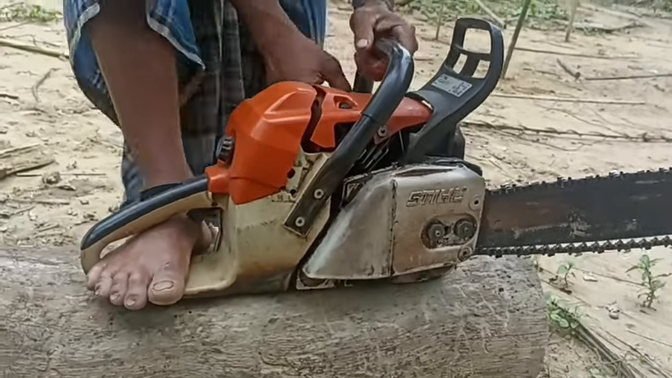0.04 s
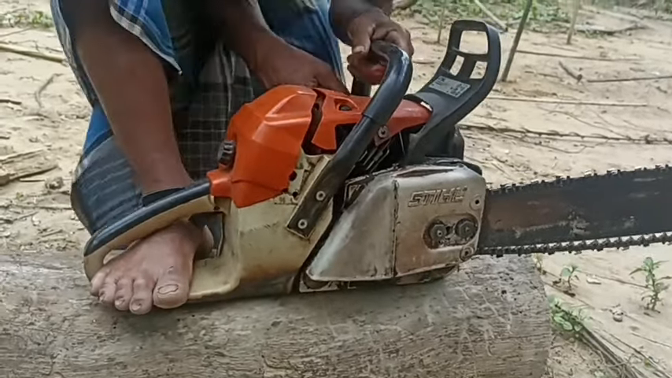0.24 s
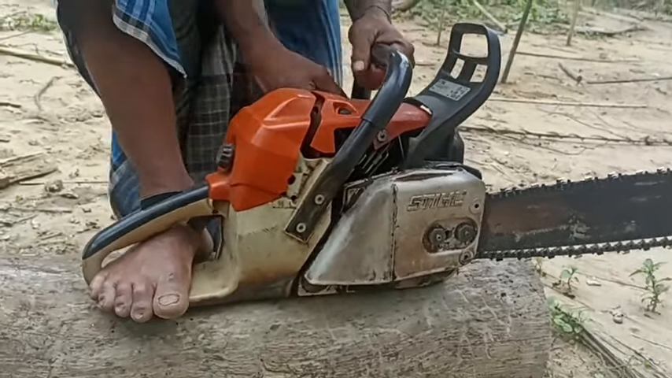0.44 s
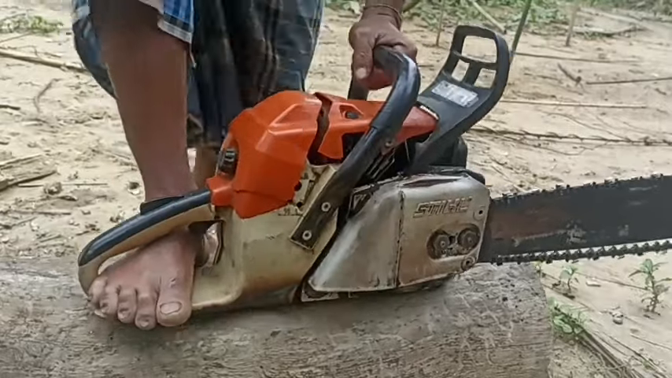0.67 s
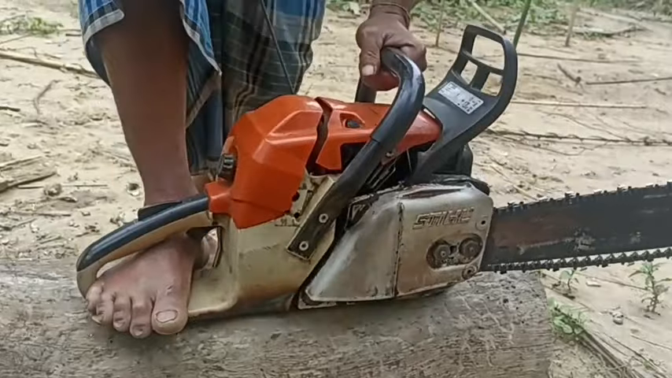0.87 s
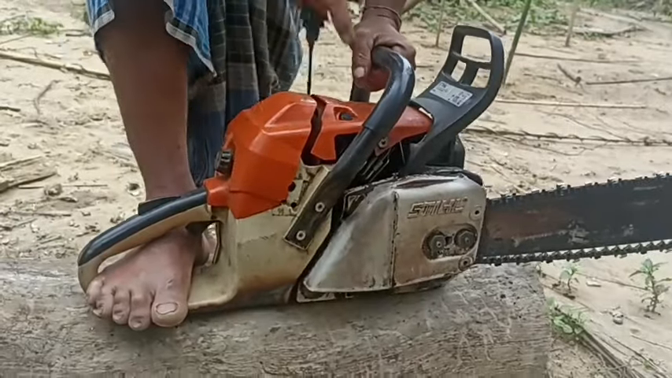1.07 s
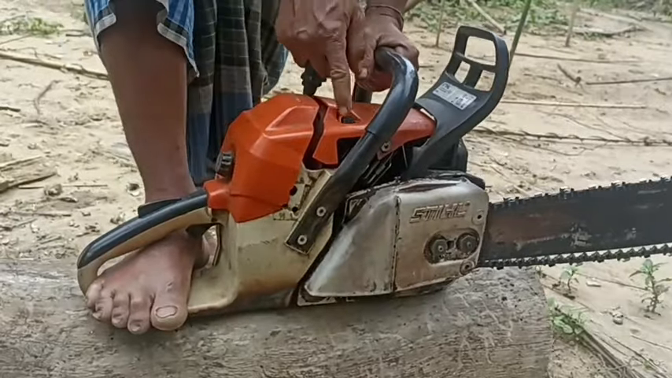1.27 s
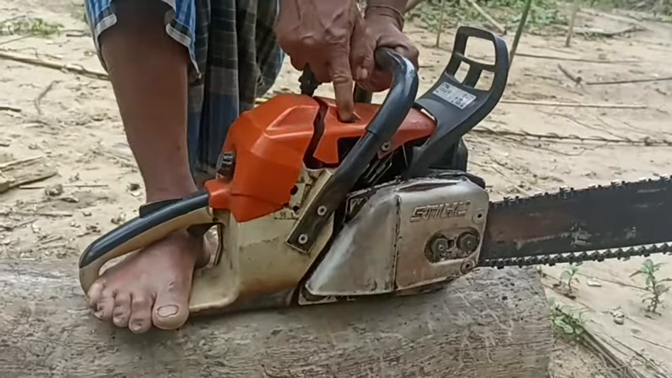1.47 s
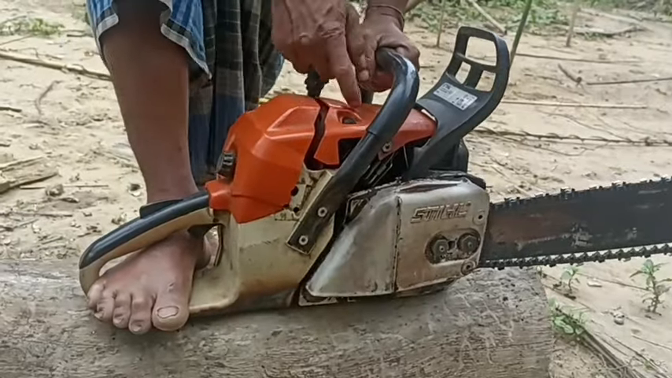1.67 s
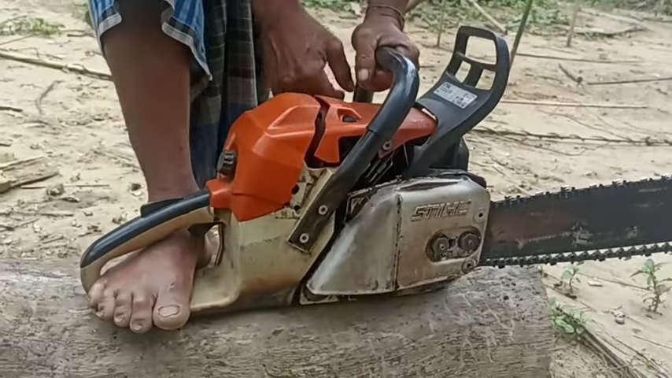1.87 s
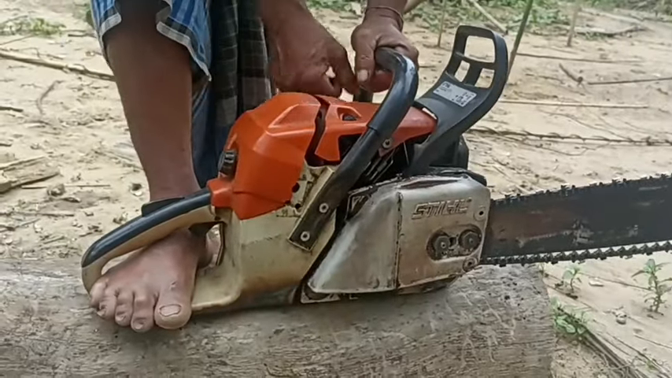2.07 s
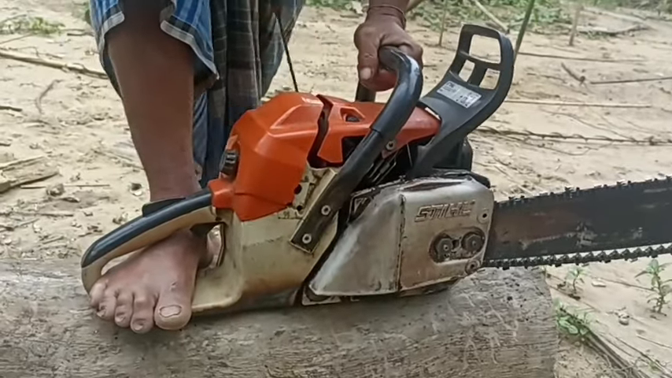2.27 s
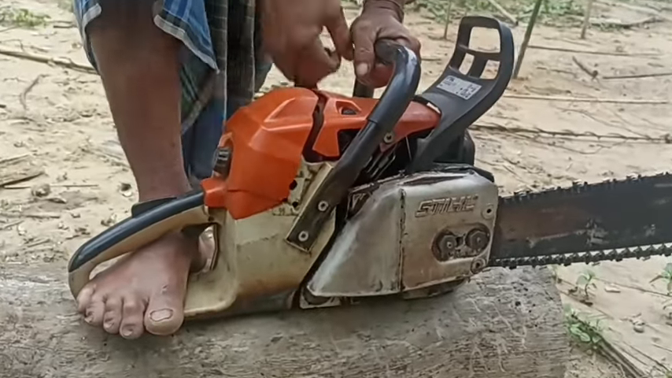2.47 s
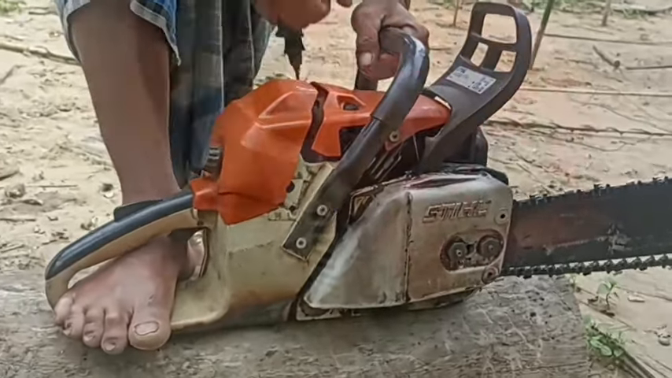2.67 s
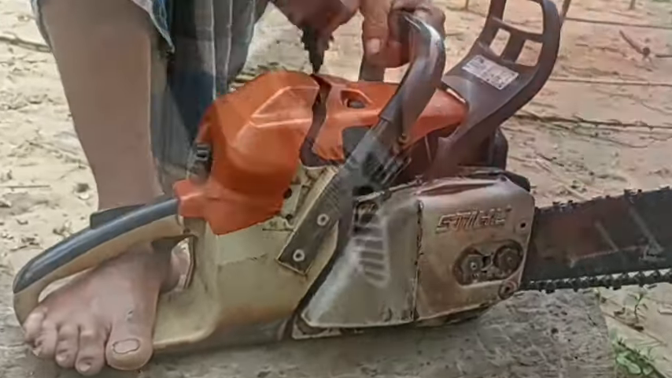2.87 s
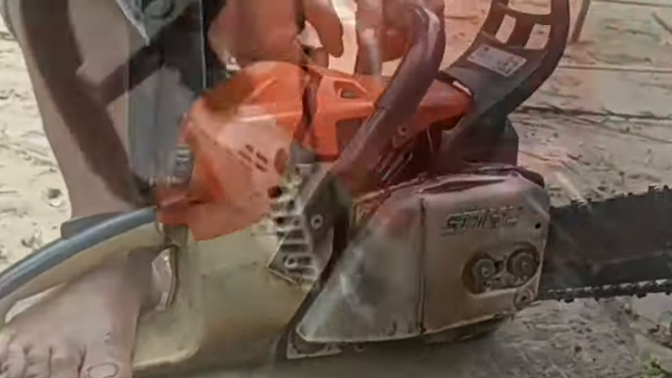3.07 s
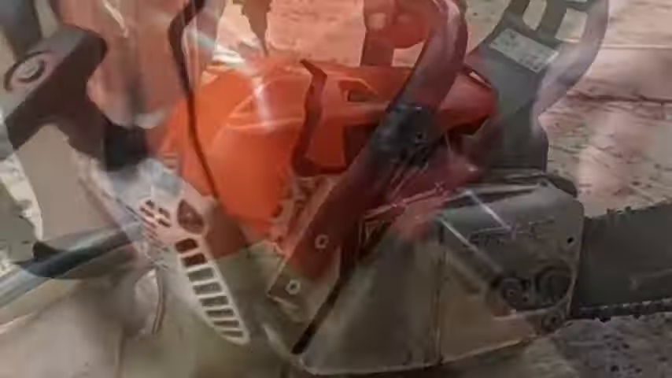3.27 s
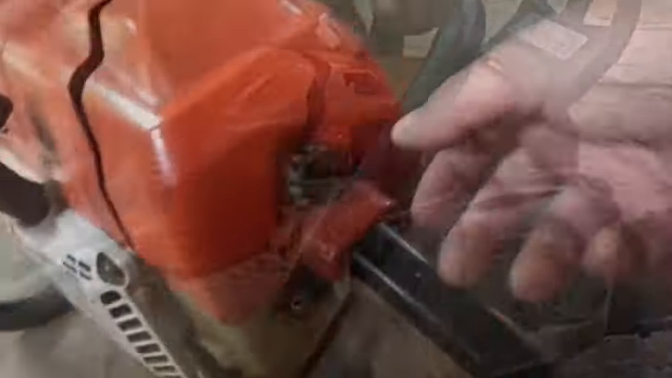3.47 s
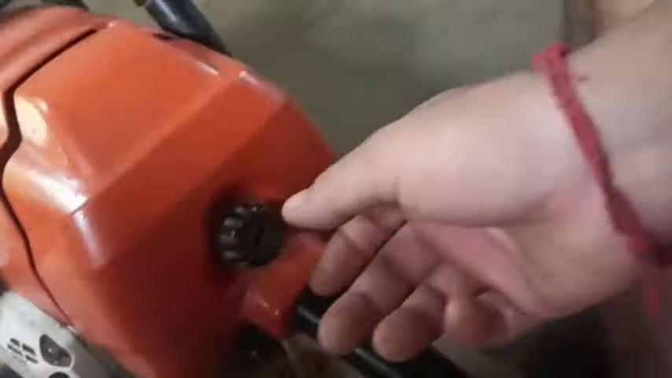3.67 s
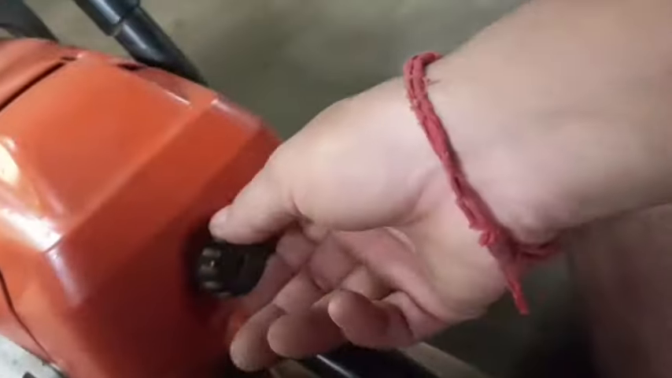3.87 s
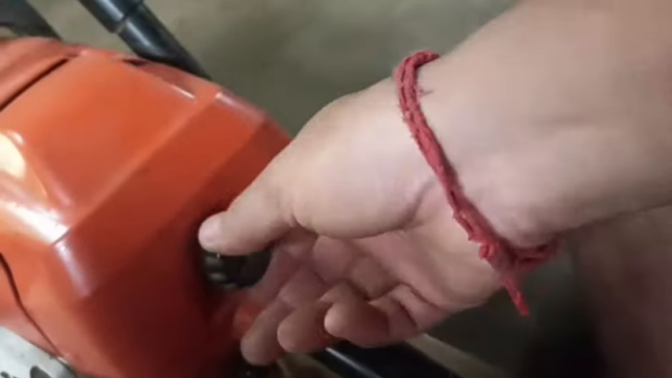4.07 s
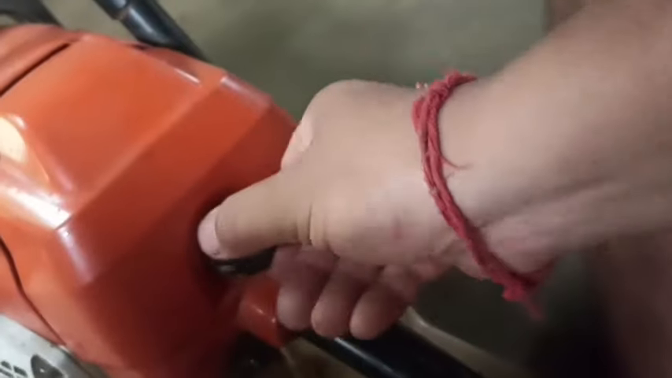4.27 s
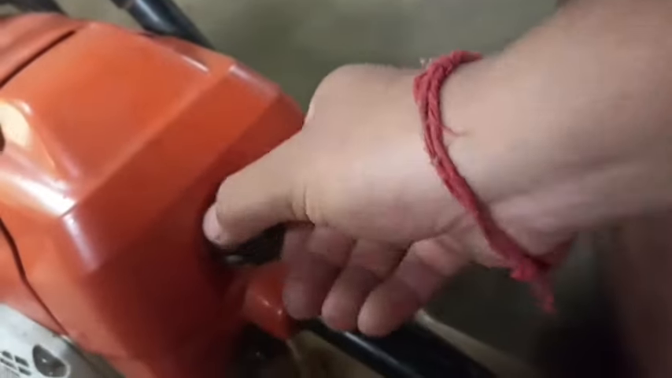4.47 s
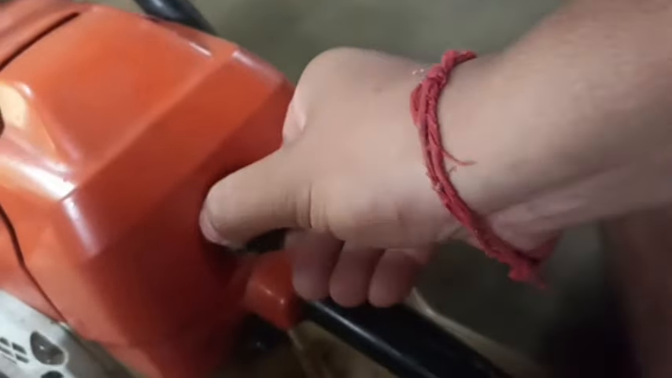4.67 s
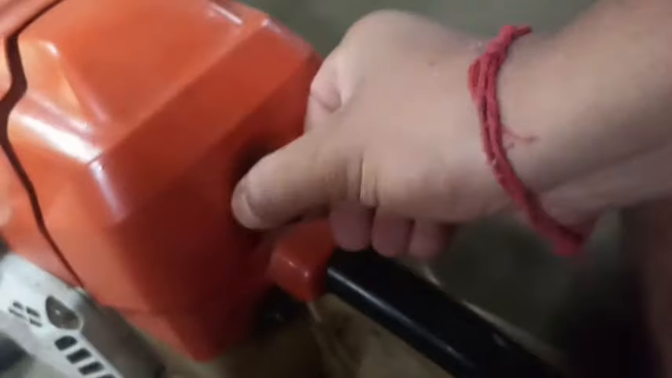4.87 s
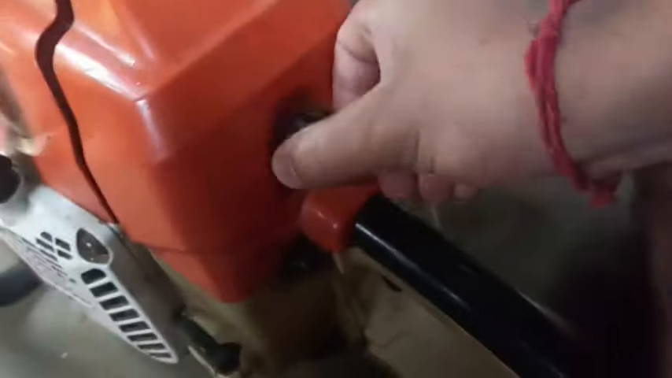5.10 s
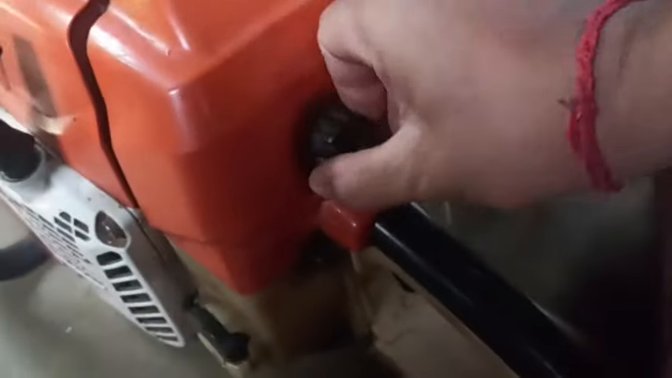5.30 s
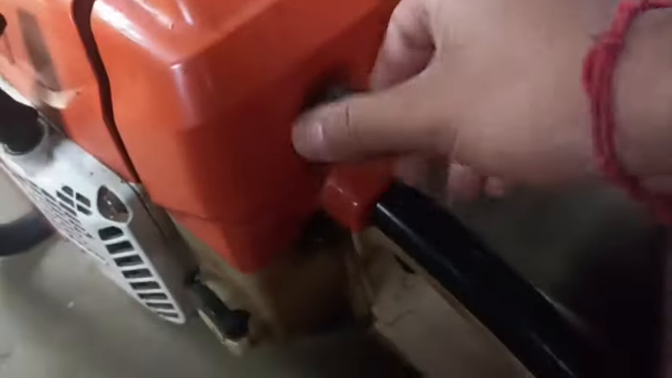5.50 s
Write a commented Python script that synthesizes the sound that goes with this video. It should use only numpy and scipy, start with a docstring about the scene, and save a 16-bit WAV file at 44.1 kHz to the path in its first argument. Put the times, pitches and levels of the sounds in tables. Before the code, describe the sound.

Close by, outdoors, a small two-stroke chainsaw gets one hard pull on its starter rope. It turns over with rapid low puffs and clatter, slowing to a stop without firing. A switch snaps sharply. The rope is drawn slowly, with rubbing, knocks on the casing and soft gliding low tones. The faint outdoor air then fades into a quieter place, where fingers lightly tap and slide on a plastic knob.

```python
"""A small two-stroke saw is pull-started on a log outdoors: the crank spins ten turns without firing, puffs through
the muffler and stops; the rope handle and starter pawls knock on the casing,
a switch snaps, and soft low tones glide up and down as the rope is drawn slowly. The scene then fades to a quieter
place, where fingers work the plastic knob of the cover."""
import sys
import numpy as np
from scipy.fft import rfft, irfft, next_fast_len
from scipy.io import wavfile
from scipy.ndimage import uniform_filter1d, map_coordinates

SR = 44100
rng = np.random.default_rng(int(sys.argv[2]) if len(sys.argv) > 2 else 0)


def int16_out(signal):
    """Quantize to a 16-bit WAV file."""
    q = np.round(np.clip(np.atleast_2d(signal).T, -1, 1) * 32767)
    wavfile.write(sys.argv[1], SR, q.astype(np.int16))


N = 244314

# crank turns: (s exhaust port opens, its puff dB, ms on to the transfer port, its puff dB)
TURNS = [(.6983, -3, 5.4, -19), (0.7358, -9, 4.8, -20.5), (0.7729, -4.1, 4.6, -17.4), (.8062, -3, 4.6, -15),
         (.8441, -3, 5.6, -11.5), (.895, -6.5, 6.6, -9), (0.948, -13, 8, -9), (1.0111, -15.5, 9.5, -10.5),
         (1.088, -16.5, 12.3, -14), (1.1933, -26.2, 18.9, -22.5), (2.2752, -38.9, 7.6, -18.5), (2.8276, -42, 14.7, -45)]
EXHAUST = [(170, 186, 0)]  # muffler as the exhaust port drives it: (Hz, width Hz, dB), fixed
CRANKCASE = [(210, 30, 0), (131, 152, -7.4)]  # muffler and crankcase joined: (Hz, width Hz, dB), fixed
# rope handle, pawls and hands on the casing: (s, middle modes dB, low, upper and bright part over them dB, left minus right dB, t60 s)
KNOCKS = [(.017, -40.5, -12, -5, -23.5, 4, 0.036), (.035, -31, -12, -.5, -9, -6, 0.014), (.052, -46.5, -5, 12.5, -24, -.5, 0.024),
          (.252, -62.5, -18, 3, 13, -5, .025), (.27, -64, -8, 9, 19.5, -5, .025), (.353, -52, -22, -3, 2, -3, 0.018),
          (.427, -58, 2, -13, -23.5, -11, 0.089), (.527, -45.5, -18, 0, -28, 1, .03), (1.253, -43.5, -15, -19, -40, -1.5, .022), (1.338, -40, -5, -6, -29, 0, 0.015),
          (1.36, -51, -6, -4, -4, -12, 0.007), (1.424, -46, -4, -3.5, -8, -6.5, 0.015), (1.625, -29, -11, -2, -5, -.5, .018),
          (1.677, -51.5, -17, 9, -15.5, -5, 0.031), (1.974, -47.5, -6, 6.5, -20, -2, .018), (1.995, -43, -7, -9, -24, -3.5, .025),
          (2.026, -33.5, -17, 4, -13, 0.5, 0.052), (2.153, -51.5, -20, 11.5, -13, 3, 0.086), (2.191, -30.5, -6, -19, -32.5, -2, 0.049),
          (2.212, -25.5, -17, -7, -12, 3.5, .065), (2.237, -13.5, -6, -11, -21.5, -2, .014), (2.311, -30.5, -13, -2.5, -7, -4.5, 0.059),
          (2.354, -14, 0, -8.5, -40, -1, 0.014), (2.381, -52, -31, 9.5, -10.5, 30, .016), (2.436, -44, -24, -4, -20, -3, 0.022),
          (2.49, -42.5, -5, -4, -23.5, -2, .046), (2.526, -39, 0.5, -1.5, -13.5, -2, 0.038), (2.572, -46, -2, -6, -14, -2, 0.019),
          (2.618, -46, -5, -2, -27, -2, .03), (2.72, -46.5, -5, -4, -15, -1, .033), (2.743, -42, -24, -3, -17.5, 0.5, .025),
          (2.752, -34, -22, -22, -19.5, -7.5, .037), (2.764, -15.5, -19, -13, -35, 1, .024), (2.823, -42, -4, -0.5, -13, -1, .032),
          (2.842, -61, -16, 7, -37, 11, 0.017), (2.863, -45.5, -20, -21.5, -28, -3, .021), (2.946, -57.5, 0, -10, 7.5, 5.5, .03),
          (3.014, -51, -23, 6.5, -30, 0, .022), (3.06, -40.5, -7, -2, -14, -3, 0.034), (3.17, -62.5, 8.5, 0, -12, -12, 0.014),
          (3.253, -33, -16.5, -3, -17.5, -1.5, .027), (3.301, -46, -2.5, -4, -11, -1, 0.047), (3.513, -47.5, -14.5, -4, -18, 1, 0.024)]
CASING = [(515, 50, -3), (730.4, 150, -4), (1000.6, 130, 4.5), (1060, 14, 6), (1180, 18, -1.5), (1697, 210, 7.5), (1390, 959, 0), (1983, 270, -11.5), (2479, 82, -0.5), (2820, 47, -25), (3580, 45, -5.5), (3070, 1600, -14)]  # (Hz, width Hz, dB)
SHEEN = [(2060, -22), (3500, -16), (3850, -10.5), (4240, -0.5), (7270, -3), (7850, -9), (8580, -9), (14900, -5),
         (16000, -26.5)]  # bright part of the blows: (Hz, dB per Hz)
# flywheel, rope and piston rubbing, for the hard pull and two slow draws of the rope: (s, level in the casing dB, level of the treble dB)
RUB = [[(.655, -60, -52), (.756, -41, -40), (.788, -30, -24), (.822, -29, -30), (.888, -46, -45), (.998, -45.5, -49.5),
        (1.146, -57.5, -60), (1.45, -70, -73.5)],
       [(2.19, -58.5, -55.5), (2.262, -58, -55.5), (2.356, -48, -44), (2.414, -66, -73), (2.542, -62.5, -61.5), (2.66, -72, -94)],
       [(2.745, -63, -47.5), (2.809, -72, -64.5), (2.9, -83, -66.5)]]
# fingers on the knob: the same columns
TAPS = [(3.942, -32.5, -2.5, -11.5, -20, -2, 0.016), (4.23, -50.5, 17, -4, -4, 3, .015), (4.335, -36.5, 2.5, -3.5, -32, 6, 0.011),
        (4.371, -58.5, 3.5, 5, 5, -4, 0.017), (4.908, -27.5, -5, -7.5, -31, 1.5, .011), (4.921, -34.5, -8, -6, -22, -1, 0.014),
        (4.955, -58, 7, 6, 9.5, -2, .023), (5.185, -42, 2.5, 16.5, 1.5, 0, .013), (5.261, -48.5, -3, 2.5, 6, 0, 0.012),
        (5.472, -64.5, -11, 15.5, 18, -2, .021)]
COVER = [(337, 300, -4), (664, 200, -4), (856.8, 350, -6), (1190, 110, 0), (1500, 360, -3), (1809, 870, -6.5), (2250, 260, -1), (3346, 170, -4), (4175, 130, -4), (5450, 200, -5)]  # (Hz, width Hz, dB)
# soft low tones that glide up and down: (s, length s, first Hz, last Hz, arch Hz, dB)
MOANS = [(2.054, .165, 205, 204, 58, -46.5), (2.301, 0.12, 231, 205, 71, -39), (2.966, 0.261, 222, 189, 62, -52.5),
         (5.379, 0.15, 194, 214, 3.1, -52.5)]
FIELD = [(18, -80.5), (30, -53.5), (73, 2), (112, -2), (189, -4.5), (526, -10), (649, -15), (702, -14.5), (1250, -14.5),
         (2060, -10.5), (3770, -23), (14000, -30.5), (16000, -33)]  # outdoor air: (Hz, dB per Hz)
QUIET = [(18, -78), (30, -32), (86, -0.5), (184, -6.5), (239, -5.5), (287, -7.5), (364, -7), (822, -20.5), (2230, -22),
         (2830, -25), (7670, -36), (8980, -31), (16000, -36)]  # the quieter place: (Hz, dB per Hz)
FIELD_DB, QUIET_DB = -54.5, -59.5
LEAN = [(60, -14), (180, -9.5), (550, 2.5), (1650, -2.5), (4970, -1), (15000, 6.5)]  # the saw: (Hz, left minus right dB)
LEAD = 5.36  # samples by which the left port hears first
TOP_HZ = 16100  # fixed
SPLIT_HZ = (850, 1900)  # fixed: borders of the low, middle and upper modes
LOW_CUT_HZ = 76  # fixed
WAY = np.array([[1], [-1]])  # left, right
MUFFLER_LEAD = 2.4  # samples, for the low muffler sound
# piston and pawl clatter of the spinning crank: the same columns
CLATTER = [(.614, -17, -16.5, -3.5, -8, -1, 0.047), (.628, -9, -10.5, -1, -13, 2, 0.034), (.662, -21, -20, -16, -11, -7, .026),
           (.682, -21.5, 1.5, 2, -2, -0.5, 0.08), (.718, -26, -13.5, 0, 8.5, 7.5, 0.025), (.756, -18, -6, 2.5, -.5, -1.5, 0.054),
           (.79, -15.5, -7, -7.5, -2.5, 2, 0.018), (.827, -21, -10.5, 11, -4, 2, .024), (.866, -22, -13.5, 4.5, 4, -4, .03),
           (.894, -33, -4, 2.5, -10, -1, .021), (.925, -19.5, -9.5, 7, -4, 0, .018), (.952, -32, .5, -16, -21, 2, .01),
           (1.008, -29, .5, -10.5, -15, -8, .02), (1.083, -33.5, 3, 11, -24.5, -0.5, 0.018), (1.188, -36, 2, 8, -28, -1.5, 0.024)]
SNAP_S, SNAP_DB = 1.6255, (-9.5, -17.5)  # a switch snaps over: left and right dB
SPRING = [(6870, 810, -11), (12240, 790, -0.5), (14200, 2100, -5)]  # its spring: (Hz, width Hz, dB)
FUMBLE = [(3.89, .16, -70), (4.34, .18, -64), (4.63, .08, -62), (4.91, 0.086, -62.5), (5.202, 0.161, -66)]  # skin slides on the knob: (s, length s, dB)
TAILPIPE = [(447, 73, 8), (680, 120, -23.5)]  # rung by the front of the jet: (Hz, width Hz, dB)
RUMBLE_HZ = 69
AIR_ALIKE = [(60, 0.7), (180, 0.9), (550, 0.57), (1650, 0.2), (4970, -0.1), (15000, 0.0)]  # (Hz, left-right likeness)
SAW_ALIKE = [(300, 1), (700, 1), (1400, 0.48), (2800, 0.25), (5600, .3), (12000, 0.18)]  # (Hz, left-right likeness)
CLOSING_AFTER, CLOSING_DRAG, CLOSING_DB = 1.1, .305, -14  # ports close this many transfer delays on, later per ms as the crank slows; dB under the opening
# how each kind of blow sounds: (hold s, bright t60 s, after-rattle dB, its t60 s)
KNOCK, CLACK, TAP = (0.0072, 0.0429, -18.5, 0.2361), (0.0042, 0.0547, -14.5, 0.2454), (0.0044, .012, -14, 0.14)
RUB_TONE = (-4.5, -2, 5.1)  # low, middle, upper modes (dB)
MOAN_LOUDEST_HZ, MOAN_DB_PER_HZ, MOAN_EDGE_S = 232, 0.3, 0.021
FADE_S, HUSH_S = (2.6, 3.63), (3.0, 3.5)  # the outdoor air fades out, the quieter place in
FUMBLE_FALL_DB, FUMBLE_TREBLE_DB, FUMBLE_TONE = 10, -7, (-8, -4, 0)
LINGER_MS = 11  # beyond this transfer delay the port stays open and the narrow crankcase note rings longer


def amp(db):
    """Gain of a level in dB."""
    return 10 ** (np.asarray(db) / 20)


def unit(x):
    """x at rms 1."""
    return x / np.sqrt(np.mean(x ** 2) + 1e-20)


def along(points, hz):
    """(Hz, value) points on a log axis."""
    f, v = np.transpose(points)
    return np.interp(np.log(hz + 1), np.log(f + 1), v)


def curves(rows, outside=-120):
    """One value per sample for each column after the time."""
    s, *cols = np.transpose(rows)
    return [np.interp(np.arange(N) / SR, s, c, outside, outside) for c in cols]


def filtered(x, response):
    """x times a complex response of frequency."""
    n = x.shape[-1]
    m = next_fast_len(n + SR // 2)
    return irfft(rfft(x, m) * response(np.fft.rfftfreq(m, 1 / SR)), m)[..., :n]


def modes(table, hz):
    """Causal response of (Hz, width, dB) resonances."""
    return sum((-1) ** k * amp(db) * 1j * hz * w / (c * c - hz * hz + 1j * hz * w) for k, (c, w, db) in enumerate(table))


def ports(pair, alike):
    """Two unrelated versions of a sound mixed into left and right ports, the left a little early."""
    turn = lambda hz: np.arccos(np.clip(along(alike, hz), -1, 1)) / 2
    mid, side = filtered(pair, lambda hz: np.array([np.cos(turn(hz)), np.sin(turn(hz))]))
    return filtered(np.array([mid + side, mid - side]), lambda hz: np.exp(WAY * 1j * np.pi * hz * LEAD / SR))


def hiss(response):
    """Two unrelated noises of rms 1 with a colour."""
    return unit(filtered(rng.standard_normal((2, N)), response))


def puffs():
    """Each port first draws air in, then pushes it out, and the cavity behind it rings."""
    out, t = np.zeros(N + SR), np.arange(SR // 5) / SR - 441 / SR  # fixed
    swing = lambda width: t / width * np.exp(-t ** 2 / (2 * width ** 2))
    ring = lambda width, cavity: filtered(swing(width), lambda hz: modes(cavity, hz))[:len(t)]
    sharp = ring(.00115, EXHAUST)  # fixed
    sharp = sharp / sharp.max()
    (note_hz, width_hz, note_db), boom = CRANKCASE
    tip = amp(-8.5) * np.exp(-(t - t[sharp.argmax()] + 0.00049) ** 2 / (2 * 0.00012 ** 2))  # the steep front of the exhaust jet
    tip = tip + amp(5.5) * filtered(tip, lambda hz: modes(TAILPIPE, hz))[:len(t)]
    for s, db, transfer_ms, transfer_db in TURNS:
        jet = tip * amp(-.9 * max(transfer_ms - 4.8, 0) + rng.normal(0, 2.0))  # a slower crank opens the port less abruptly
        slow = max(transfer_ms / LINGER_MS, 1)
        round_ = ring(.00145, [(note_hz, width_hz / slow, note_db + 20 * np.log10(slow)), boom])  # fixed
        round_ = round_ / round_.max()
        closing_ms = transfer_ms * (CLOSING_AFTER + CLOSING_DRAG * transfer_ms)
        for ms, level, shape, front in ((0, db, sharp, jet), (transfer_ms, transfer_db, round_, 0), (closing_ms, db + CLOSING_DB, sharp, jet)):
            out[round((s + ms / 1000) * SR) - shape.argmax():][:len(t)] += amp(level) * (shape + front)  # fixed
    gust = uniform_filter1d(np.abs(out[:N]), size=300)  # turbulence rides on every puff
    shudder = uniform_filter1d(np.abs(out[:N]), size=4000) * unit(filtered(rng.standard_normal(N), lambda hz: modes([(130, 200, 0)], hz)))  # the saw shakes on the log
    return out[:N] + amp(-16) * shudder + amp(-13.0) * gust * unit(filtered(rng.standard_normal(N), lambda hz: modes([(379, 340, 0)], hz)))


def blows(events, kind):
    """Each blow is a short rattle: envelopes for the body's low, middle and upper modes and for the bright crack."""
    hold, bright_t60, tail_db, tail_t60 = kind
    shake, t = np.zeros((4, 2, N + SR)), np.arange(SR // 4) / SR
    held = np.maximum(t - hold * np.array([[1], [1], [.8], [.3]]), 0)
    strike = amp(np.array([[-3], [3], [3], [4]]) - 60 * t / 0.0099)  # the first strike
    rattle = amp(tail_db - 60 * t / tail_t60)  # a weak after-rattle
    for s, db, dull_db, upper_db, bright_db, pan_db, t60 in events:
        fall = amp(-60 * held / np.maximum([[t60], [t60], [t60], [bright_t60]], .004)) + strike + rattle
        fall *= amp(db - 6 + np.array([[dull_db], [0], [upper_db], [bright_db]])) * (1 - np.exp(-t / 0.0019))
        shake[..., round(s * SR):][..., :len(t)] += fall[:, None] * amp(WAY * pan_db / 2)
    return shake[..., :N]


def parts(shake, body):
    """Noise under four envelopes through the low, middle and upper modes and the bright spectrum."""
    groups = [[m for m in body if np.searchsorted(SPLIT_HZ, m[0]) == k] for k in range(3)]
    soft = lambda hz, g: modes(g, hz) / (1 + 1j * hz / (0.94 * max(g)[0])) ** 2  # the contact is too soft to drive far above the modes
    colours = [lambda hz, g=g: soft(hz, g) for g in groups] + [lambda hz: amp(along(SHEEN, hz))]
    bands = [(.8 * min(g)[0], 1.25 * max(g)[0]) for g in groups] + [(1000, SR)]  # fixed
    out = 0
    for envelope, colour, band in zip(shake, colours, bands):
        noise = ports(even(*band), SAW_ALIKE)
        out = out + filtered(envelope * noise, colour) / np.std(filtered(noise, colour))
    return out


def rubbing(spans, tone_db):
    """Grainy friction: envelopes for the same four parts."""
    body, treble = uniform_filter1d(sum(amp(curves(rows)) for rows in spans), size=500)
    grain = amp(3 * map_coordinates(rng.standard_normal(N // 200 + 4), [np.arange(N) / 200]))  # fixed
    return (unit(grain) * np.array([*(amp(tone_db)[:, None] * body), treble]))[:, None]


def moans():
    """Soft tones without overtones, loudest where the glide crosses one pitch."""
    out, t = np.zeros(N), np.arange(N) / SR
    for s, length, first_hz, last_hz, arch_hz, db in MOANS:
        u = np.clip((t - s) / length, 0, 1)
        hz = first_hz + (last_hz - first_hz) * u + arch_hz * np.sin(np.pi * u)
        swell = np.minimum(np.minimum(u, 1 - u) * length / MOAN_EDGE_S, 1) * amp(db - MOAN_DB_PER_HZ * np.abs(hz - MOAN_LOUDEST_HZ))
        out += swell * np.sin(2 * np.pi * np.cumsum(hz) / SR)
    return out


def air():
    """The outdoor air fades into the hush of the quieter place."""
    t = np.arange(N) / SR
    return (amp(FIELD_DB) * np.interp(t, FADE_S, (1, 0)) * hiss(lambda hz: amp(along(FIELD, hz)))
            + amp(QUIET_DB) * np.interp(t, HUSH_S, (0, 1)) * hiss(lambda hz: amp(along(QUIET, hz))))


def snap():
    """One sharp kick of the switch spring and a short buzz after it."""
    t = np.maximum(np.arange(N) / SR - SNAP_S, 0)
    kick = (t > 0) * (amp(-60 * t / 0.0089) + amp(-23 - 60 * t / 0.14)) * rng.standard_normal((2, N))
    return amp(np.array(SNAP_DB)[:, None] + 9.5) * filtered(kick, lambda hz: modes(SPRING, hz))


def even(lo_hz, hi_hz):
    """Two noises in a band, of steady strength from one moment to the next."""
    pair = filtered(rng.standard_normal((2, N)), lambda hz: 1 / (1 + (lo_hz / (hz + 1)) ** 4 + (hz / hi_hz) ** 4))  # fixed
    return pair / np.sqrt(np.abs(uniform_filter1d(pair ** 2, size=150)) + 1e-9)


def scene():
    """Saw and knob near the microphone, air all round."""
    casing = parts(blows(KNOCKS, KNOCK) + blows(CLATTER, CLACK) + rubbing(RUB, RUB_TONE), CASING)
    saw = filtered(casing, lambda hz: amp(WAY * along(LEAN, hz) / 2))
    muffler = filtered(puffs() + moans(), lambda hz: np.exp(WAY * 1j * np.pi * hz * MUFFLER_LEAD / SR))
    slides = [[(at, level, level + FUMBLE_TREBLE_DB) for at, level in ((s, db), (s + length, db - FUMBLE_FALL_DB))]
              for s, length, db in FUMBLE]
    knob = parts(blows(TAPS, TAP) + rubbing(slides, FUMBLE_TONE), COVER)
    return muffler + saw + snap() + knob + ports(air(), AIR_ALIKE)


def record(dry):
    """The microphone rolls off the bass, a rumble filter the deepest; the camera keeps nothing above its band limit."""
    cut = lambda hz: (1j * hz / (LOW_CUT_HZ + 1j * hz)) ** 2 / (1 + (RUMBLE_HZ / (hz + 1)) ** 4)
    return filtered(dry, lambda hz: cut(hz) * (hz < TOP_HZ))


dry = scene()
out = record(dry)
int16_out(out)
```